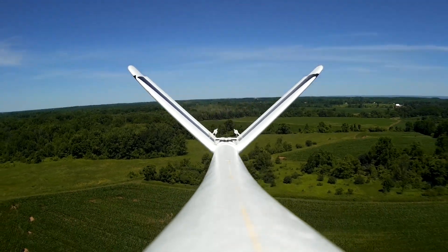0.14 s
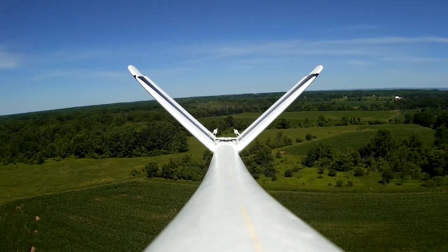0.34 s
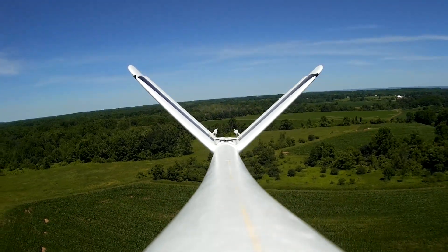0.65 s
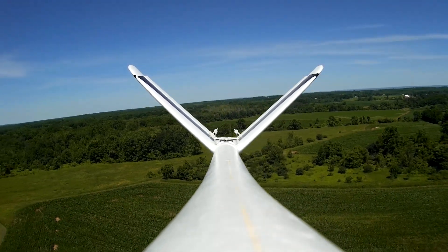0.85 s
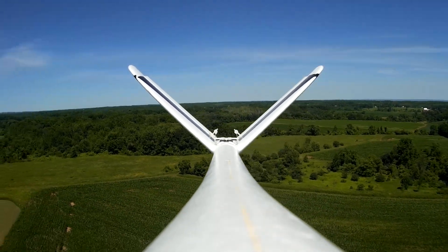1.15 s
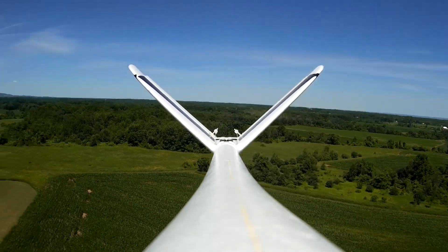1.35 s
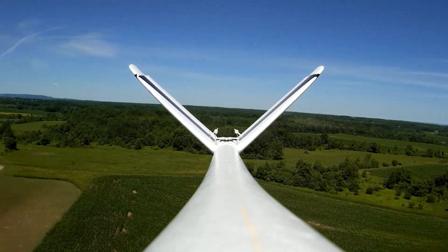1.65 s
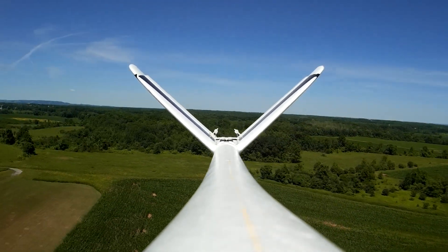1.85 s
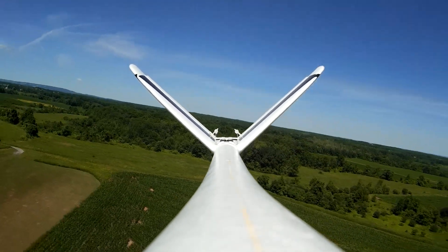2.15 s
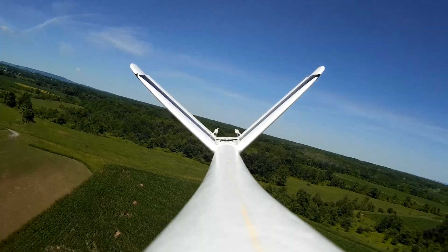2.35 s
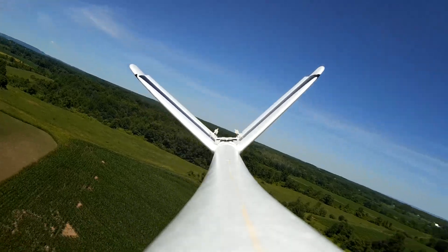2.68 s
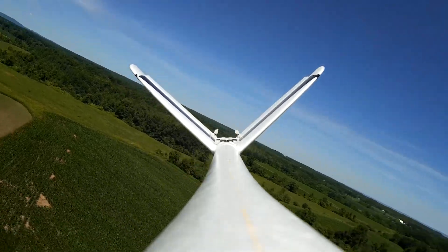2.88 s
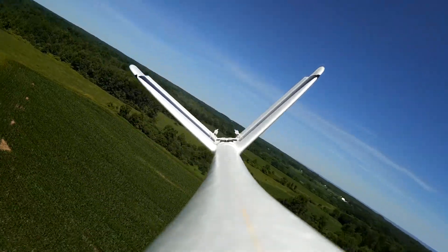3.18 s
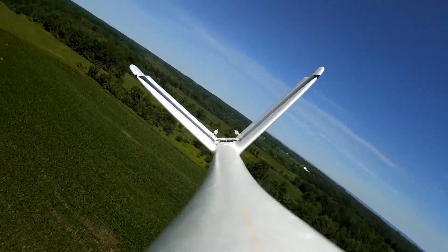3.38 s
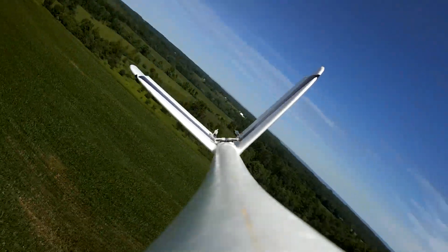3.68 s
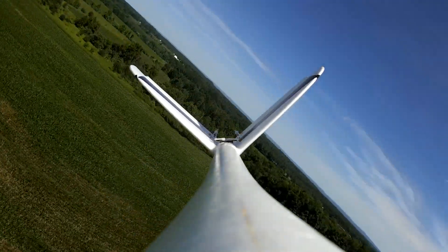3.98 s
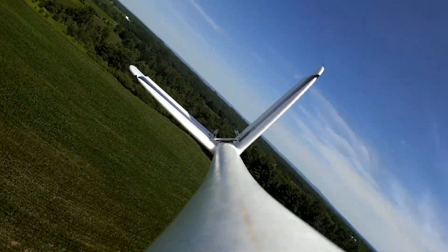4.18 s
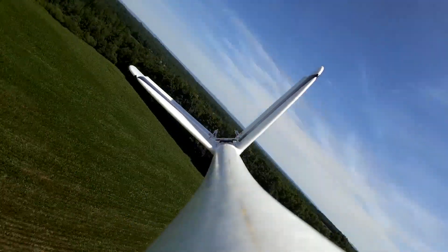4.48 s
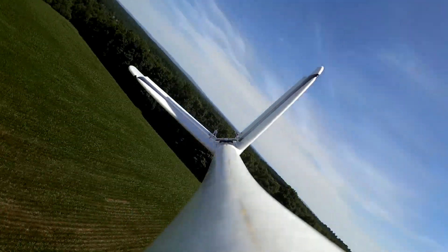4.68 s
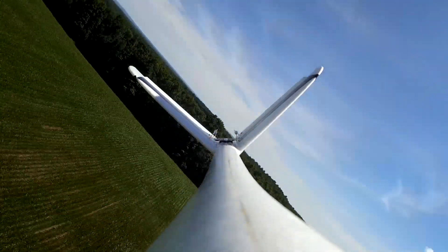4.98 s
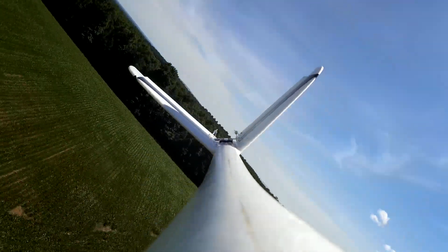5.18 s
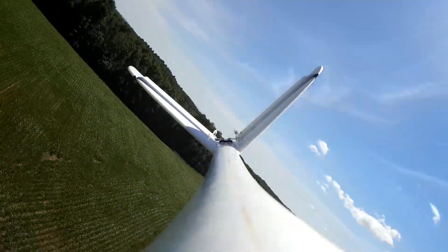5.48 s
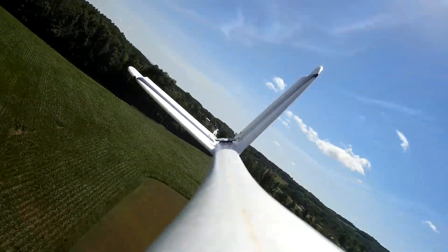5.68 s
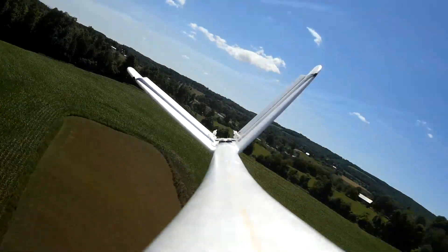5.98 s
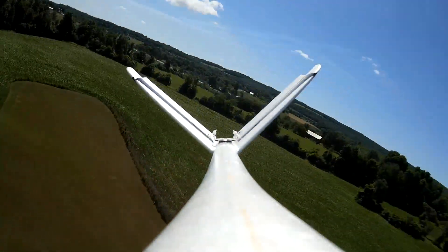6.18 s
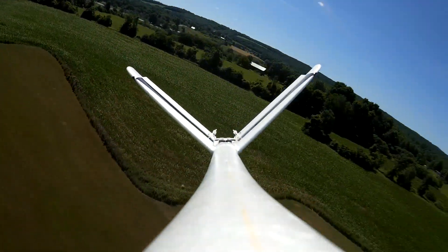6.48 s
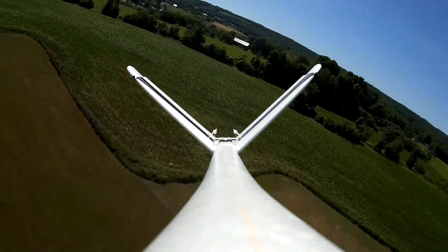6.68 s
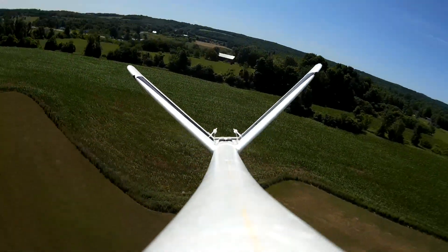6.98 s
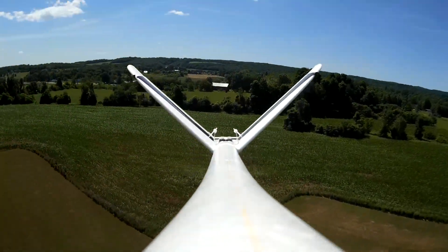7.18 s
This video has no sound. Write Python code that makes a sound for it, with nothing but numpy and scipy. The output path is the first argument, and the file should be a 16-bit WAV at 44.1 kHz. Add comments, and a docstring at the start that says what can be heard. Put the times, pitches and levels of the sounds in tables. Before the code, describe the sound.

Low, buffeting wind on the microphone of a model glider in flight, with brief early sputters of air and faint ticking.

```python
"""Wind on a model glider

Air rushes over a camera microphone on the back of a model glider as it banks over fields.
Eddies (swirls of air) thump the microphone's opening under a smooth rush. Early on, the air
sputters past a narrow gap and tears away from the glider's skin in short hisses.
The shell ticks faintly as it flexes, and the overloaded microphone rounds off the biggest thumps."""
import sys
import numpy as np
from scipy import signal
from scipy.fft import rfft, irfft, next_fast_len
from scipy.io import wavfile
from scipy.ndimage import uniform_filter1d, map_coordinates

SR = 44100
rng = np.random.default_rng(int(sys.argv[2]) if len(sys.argv) > 2 else 0)


def wrap_up_sound(samples):
    """Save the sound to the file named by the first command line argument, as 16-bit audio."""
    columns = np.atleast_2d(samples).T
    # keep every value between -1 and 1, then stretch to whole-number steps
    tamed = np.clip(columns, -1, 1)
    steps = np.round(tamed * 32767).astype(np.int16)
    wavfile.write(sys.argv[1], SR, steps)


N = 323694
TIME = np.arange(N) / SR

# how fast the eddies sweep past: t/s, speed (1 = cruising)
AIR_SPEED = [(0, 0.98), (2.6, 1.125), (3.6, 0.94), (4.9, 0.99), (5.65, 0.9), (6.4, .95), (6.85, 0.85),
             (7.3, 1.02)]


def undb(db):
    """Turn decibels into a number to multiply by."""
    return 10 ** (np.asarray(db) / 20)


def unit(x):
    """Scale a signal so its average size (rms) is 1."""
    return x / np.sqrt(np.mean(x ** 2))


def curve(table):
    """Join (time, value) points with straight lines, one value a sample."""
    return np.interp(TIME, *np.transpose(table))


def colour(x, tone):
    """Shape a sound's lows and highs along (Hz, dB) points; white noise keeps its power."""
    hz, db = np.transpose(tone)
    size = next_fast_len(N + SR // 4) * 2
    bin_hz = np.arange(size // 2 + 1) * SR / size
    gain = unit(undb(np.interp(np.log(bin_hz + 1), np.log(hz), db)))
    # this folding makes the filter ring after each hit, never before
    cepstrum = irfft(np.log(gain))
    cepstrum[1:size // 2] *= 2
    cepstrum[size // 2 + 1:] = 0
    return irfft(rfft(x, size) * np.exp(rfft(cepstrum)))[:N]


def low_pass(x, hz):
    """Keep the part of a sound below hz."""
    return signal.sosfiltfilt(signal.butter(2, hz, fs=SR, output="sos"), x)


def wander(rate):
    """Glide to a new random value `rate` times a second; typical size 1."""
    hold = max(int(SR / rate), 1)
    steps = rng.standard_normal(N)[np.arange(N) // hold]
    return unit(uniform_filter1d(steps, hold))


def add(track, s, sound):
    """Mix a short sound in at s seconds."""
    start = int(np.clip(s * SR, 0, N - 1))
    track[start:start + len(sound)] += sound[:N - start]


def turbulence(tone, flicker_db, rate):
    """The noise of many eddies whose strength flickers."""
    return unit(colour(rng.standard_normal(N) * undb(flicker_db * wander(rate)), tone))


def gust_db(cruise_db=-54):
    """How much stronger the airflow is than when cruising."""
    # strength of the airflow: t/s, level/dB
    flow = [(0.04, -50.5), (0.85, -52), (1.33, -48.5), (1.41, -53), (1.96, -50), (2.49, -54), (3.15, -48.5),
            (3.5, -56), (3.68, -51), (4.27, -57), (4.97, -52.5), (5.36, -57.5), (5.52, -55), (5.64, -59),
            (5.76, -54), (6.15, -55), (6.17, -53), (6.69, -56), (6.77, -61), (7.3, -55)]
    return curve(flow) - cruise_db


def buffet(cruise_db=-45, slowing_db=21.5):
    """The churned air behind the glider's body thumps the microphone, harder as the glider slows."""
    # tone of the thumps: f/Hz, level/dB
    tone = [(12, -12.5), (25, -7), (40, -1), (62, 2), (105, 2), (150, -4), (300, -24), (5000, -100)]
    speed_lost = 1 - curve(AIR_SPEED)
    return turbulence(tone, flicker_db=1.0, rate=11) * undb(cruise_db + slowing_db * speed_lost)


def rumble():
    """A fixed pattern of big eddies is carried past: the slower the air, the deeper the rumble."""
    # tone of the eddies at cruising speed: f/Hz, level/dB
    tone = [(50, -23), (110, -0.5), (155, 2.5), (240, 0), (330, -6), (480, -15.5), (5000, -97)]
    # strength of the eddies: t/s, level/dB
    levels = [(0, -44.5), (1.0, -46), (1.4, -44), (3.1, -43), (4.4, -44.5), (5.0, -43), (5.6, -45),
              (6.65, -44), (6.85, -45.5), (7.3, -45)]
    eddies = turbulence(tone, flicker_db=1.07, rate=27)
    travelled = np.cumsum(curve(AIR_SPEED))
    return map_coordinates(eddies, [travelled], order=3, mode="mirror") * undb(curve(levels))


def rush(puffs, level_db=-51):
    """Smaller eddies make a smooth rush; gusts make it louder and brighter."""
    # tone of the rush: f/Hz, level/dB
    tone = [(150, -9.5), (330, 1), (450, 0.5), (650, -4.5), (900, -7.5), (1200, -10.5), (1430, -10),
            (1700, -14.5), (2100, -24.5), (8000, -81.5)]
    air = turbulence(tone, flicker_db=0.46, rate=140) * undb(level_db + 0.7 * puffs)
    lows = low_pass(air, hz=700)
    return lows * undb(0.81 * gust_db()) + (air - lows) * undb(1.17 * gust_db())


def hiss(puffs, level_db=-68, slowing_db=-5):
    """Small eddies make a fine hiss that grows with gusts and fades as the glider slows."""
    # tone of the hiss: f/Hz, level/dB
    tone = [(1000, -6.5), (1900, 4.5), (2350, 2), (2900, 2.5), (3450, -4.5), (3950, -4.5), (4700, -13.5),
            (6200, -19), (7500, -20), (8400, -24.5), (9300, -23), (10200, -31.5), (12500, -34.5),
            (15500, -46.5)]
    speed_lost = 1 - curve(AIR_SPEED)
    swell_db = 1.06 * gust_db() + slowing_db * speed_lost + 0.87 * puffs
    return turbulence(tone, flicker_db=1.95, rate=300) * undb(level_db + swell_db)


def swell(length_s):
    """The strength of one small eddy: it rises and dies away."""
    return np.hanning(int(length_s * SR) + 3)


def sputter(count=1050, weak_s=0.0056, strong_s=0.0042, weak_db=-0.7, strong_db=-5.5, scatter_db=6.8):
    """Air spits past a narrow gap that rings near 4 kHz: a few strong spits among many weak ones."""
    # tone of the gap: f/Hz, level/dB
    tone = [(600, -17), (1450, -11), (2100, 1.5), (2700, -6.5), (3350, -3.5), (3850, 3.5), (4300, -1),
            (4900, -7.5), (5600, -16), (7700, -19), (8400, -24), (9300, -21), (10300, -34), (14000, -47)]
    # the strong spits: t/s, relative level/dB
    spits = [(0.1136, -46), (0.221, -45.5), (0.2394, -48), (0.2576, -53), (0.383, -48), (0.7073, -45),
             (0.834, -46), (0.9056, -46), (0.9955, -46), (1.149, -54), (1.1643, -47.5), (1.2143, -47.5),
             (1.29, -48), (7.075, -59)]
    # the weak spits, dying away as the glider banks: t/s, relative level/dB
    levels = [(0, -65), (.28, -63), (.42, -74), (.6, -61), (.98, -68), (1.04, -79), (1.12, -63), (1.3, -68),
              (1.42, -75), (1.95, -77), (2.05, -66), (2.2, -81), (3.4, -85.5), (7.3, -90.5)]
    strong, weak = np.zeros(N), np.zeros(N)
    for when, faintness, length in rng.random((count, 3)):
        gain = undb(-scatter_db * np.log(0.1 + faintness))
        add(weak, when * N / SR, gain * swell(weak_s * (.5 + length)))
    for s, db in spits:
        add(strong, s - .001, undb(db + strong_db) * swell(strong_s))
    strength = np.hypot(strong, unit(weak) * undb(curve(levels) + weak_db))
    return colour(strength * rng.standard_normal(N), tone)


def tearing(fade_s=0.0094):
    """The air breaks away from the glider's skin and hisses until it settles again."""
    # tone of the torn air: f/Hz, level/dB
    tone = [(700, -5.5), (1400, 16), (2000, 4), (2800, 1.5), (3400, -2), (3900, 8), (5000, -9.5),
            (6800, -8.5), (7700, -6), (8400, -14), (9400, -8), (10200, -31), (11200, -23), (14000, -49)]
    # each tear: t/s, length/s, level/dB, treble boost/dB
    tears = [(0.566, 0.076, -56, -3), (0.745, 0.034, -56, 0.5), (1.527, 0.041, -56.5, 0),
             (1.828, 0.065, -54.5, 3.5), (1.906, 0.023, -51, 1.5), (5.497, 0.093, -66.5, 9)]
    noise = turbulence(tone, flicker_db=0.8, rate=360)
    lows = low_pass(noise, hz=5500)
    out = np.zeros(N)
    for s, length_s, db, treble_db in tears:
        fade = np.clip(np.minimum(TIME - s, s + length_s - TIME) / fade_s + .5, 0, 1)
        out += undb(db) * fade * (lows + undb(treble_db) * (noise - lows))
    return out


def shell_ticks(per_second=105, scatter_db=12, crackle_db=-4, tick_db=4.5, rattle_s=0.00091):
    """The flexing shell ticks, each time with a tiny rattle, over a crackle that grows with gusts."""
    # tone of the shell: f/Hz, level/dB
    tone = [(1500, -20.5), (4000, 2), (5500, 1), (7300, 0), (8400, -8.5), (9250, 1.5), (10000, -11),
            (11000, -9.5), (12000, -21.5), (15500, -14.5)]
    # the loudest ticks: t/s, relative level/dB
    ticks = [(0.9597, -55), (1.039, -48), (1.645, -52), (1.6804, -49.5), (1.7287, -48), (1.7367, -49),
             (1.9135, -45), (2.0991, -55), (3.2785, -52.5), (3.5325, -54), (3.68, -49), (3.9838, -53),
             (4.667, -54.5), (5.0804, -57), (5.306, -56), (5.4492, -53), (5.7482, -56), (6.0557, -56),
             (6.5041, -56), (6.571, -54), (6.7311, -58.5), (6.9227, -55), (6.946, -60.5)]
    # the crackle before gusts are added; it returns in the steep turn: t/s, relative level/dB
    crackle = [(0, -84), (1.7, -89), (2.3, -99), (3.15, -100), (3.33, -81), (3.7, -82.5), (4.5, -90.5),
               (4.85, -82.5), (6.7, -80), (7.05, -91), (7.3, -89)]
    strain_db = curve(crackle) + crackle_db + 1.1 * gust_db() + 1.8 * wander(rate=12)
    sizes = undb(-scatter_db * rng.random(N) ** .6)
    hits = rng.random(N) < per_second / SR
    pulses = unit(sizes * hits) * undb(strain_db)
    for s, db in ticks:
        add(pulses, s + .001, undb([db + tick_db]))
    tails = signal.lfilter([1], [1, -np.exp(-1 / (rattle_s * SR))], pulses)
    rattle = 0.18 * tails * rng.standard_normal(N)
    return colour(pulses + rattle, tone)


def scene(mic_hiss_db=-88):
    """Everything reaches one microphone directly, over its own faint hiss; open air adds no echo."""
    # tone of the microphone's own hiss: f/Hz, level/dB
    mic_tone = [(1000, 2), (7500, -5.5), (8400, -7), (9300, -7), (10500, -14), (15500, -12.5)]
    mic_hiss = undb(mic_hiss_db) * colour(rng.standard_normal(N), mic_tone)
    puffs = wander(rate=110) + 0.42 * wander(rate=14)  # rush and hiss flutter together
    wind = buffet() + rumble() + rush(puffs) + hiss(puffs)
    return (wind + sputter() + tearing() + shell_ticks() + mic_hiss)[None]


def record(dry, ceiling_db=-30.3, hardness=8, top_hz=15750):
    """The overloaded microphone rounds off the biggest swings; the highest treble is cut."""
    overload = np.abs(dry / undb(ceiling_db))
    rounded = dry / (1 + overload ** hardness) ** (1 / hardness)
    return signal.sosfilt(signal.ellip(8, .2, 70, top_hz, fs=SR, output="sos"), rounded)


dry = scene()
out = record(dry)
wrap_up_sound(out)
```